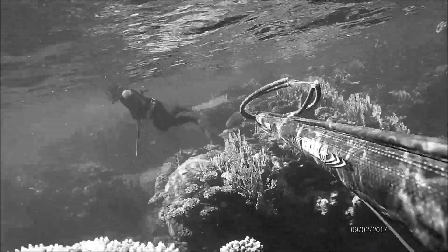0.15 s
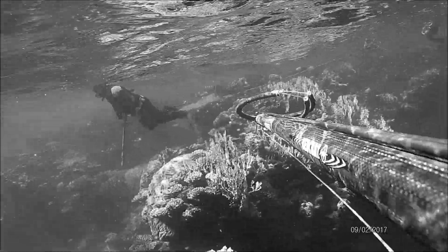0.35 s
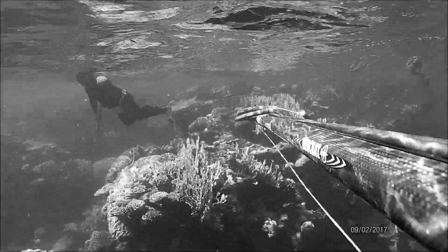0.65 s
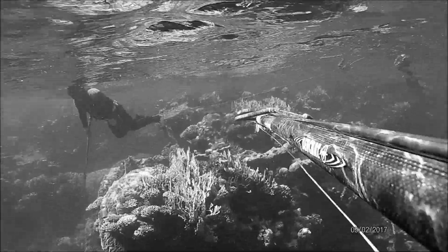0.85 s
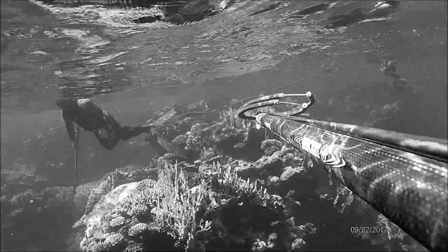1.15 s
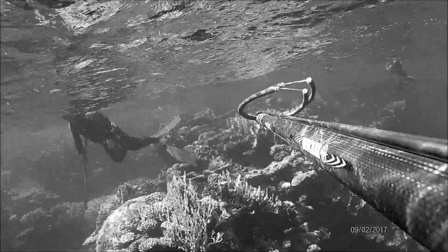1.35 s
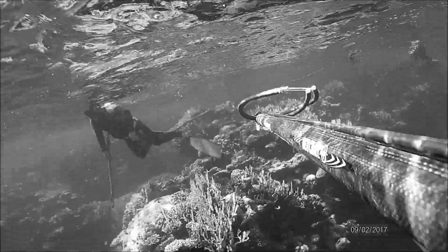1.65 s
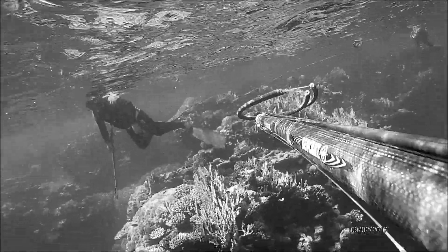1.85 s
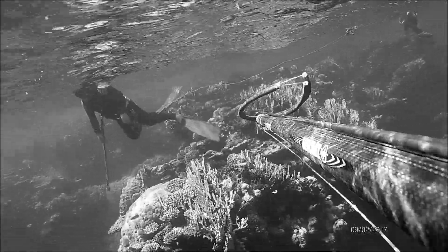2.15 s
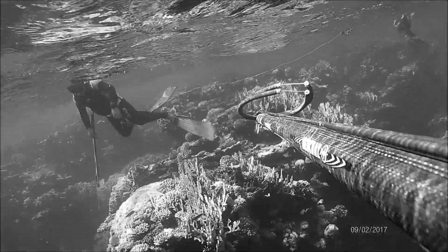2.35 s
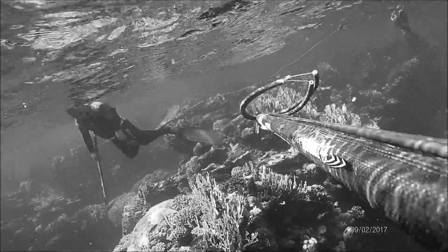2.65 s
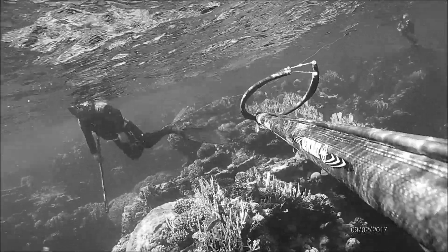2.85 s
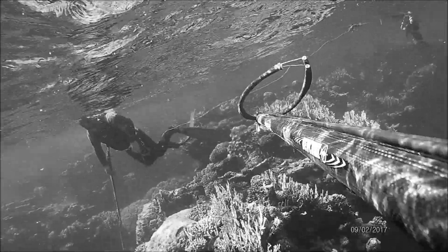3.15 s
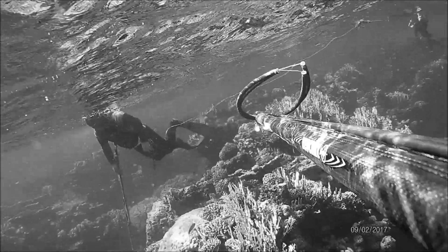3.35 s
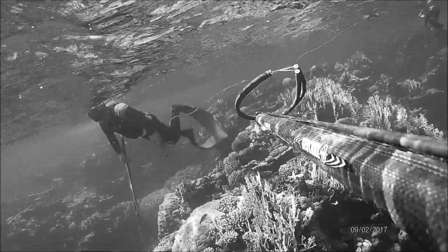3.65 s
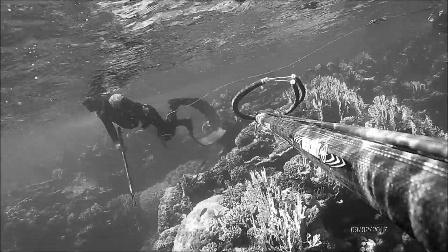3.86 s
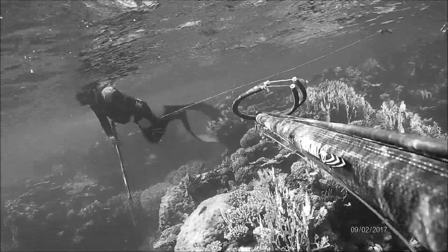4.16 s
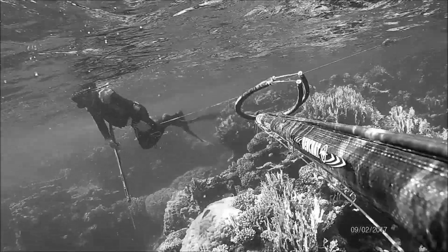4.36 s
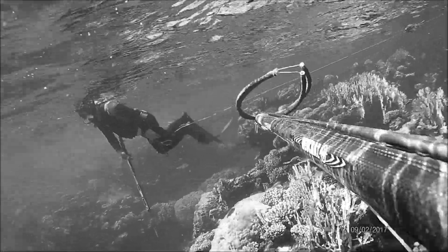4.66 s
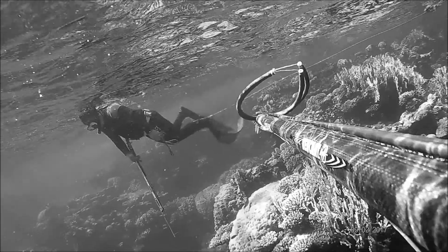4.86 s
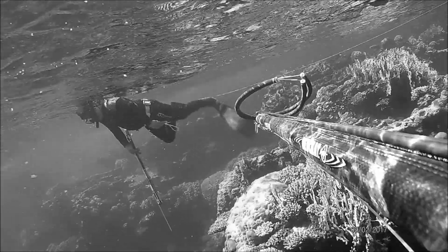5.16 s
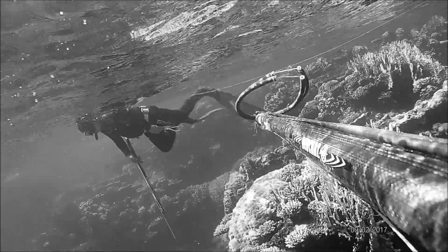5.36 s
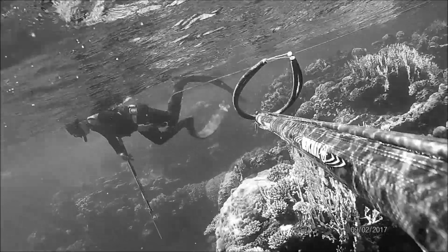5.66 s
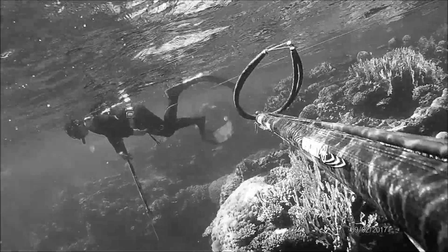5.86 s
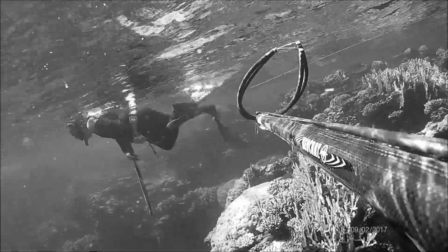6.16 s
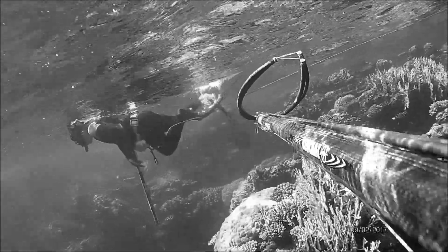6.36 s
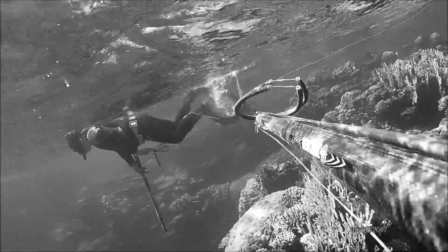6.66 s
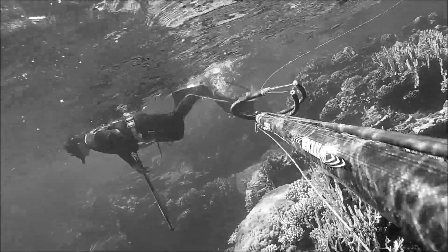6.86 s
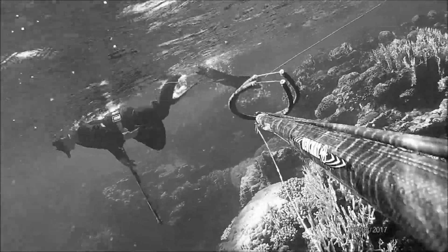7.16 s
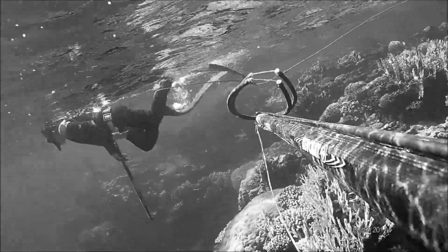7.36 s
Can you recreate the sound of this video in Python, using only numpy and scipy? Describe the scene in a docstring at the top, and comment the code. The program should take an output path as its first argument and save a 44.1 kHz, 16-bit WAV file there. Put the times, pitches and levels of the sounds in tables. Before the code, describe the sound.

Heard from inside a hard plastic camera housing under water over a reef. Low surges and dense hollow knocks build to a loud churning burst just before one second, with air tearing out in falling tones. It then settles into scattered knocks, fine crackle and snaps. From three seconds low bubbles gulp upward, with one tiny high peep and a few short plinks, over faint hiss and a thin high whine.

```python
"""A camera in a hard plastic housing drifts under water over a reef, heard through the ringing shell. From the
start water churns and surges, small bubbles fizz, the reef crackles and electronics hiss and whine: shaped
noise, short tones, struck shell modes and thin sines. Gear knocks and sharp snaps strike the shell. Just before
one second the churn peaks and air rushes out as torn, falling tones. From three seconds come low bubble gulps
that rise in pitch and one high, brief peep, and soon after short plinks of steady pitch."""
import sys
import numpy as np
from scipy import signal
from scipy.fft import rfft, irfft
from scipy.io import wavfile
from scipy.ndimage import uniform_filter1d

SR = 44100
rng = np.random.default_rng(int(sys.argv[2]) if len(sys.argv) > 2 else 0)


def invert_db(level):
    """Linear amplitude ratio for a level in decibels (20 dB per decade), elementwise."""
    return 10 ** (np.asarray(level, dtype=float) / 20)


def transcribe(signal):
    """Save signal, clipped to [-1, 1], as a 16-bit WAV file at the path in sys.argv[1]."""
    frames = np.atleast_2d(signal).T
    limited = np.clip(frames, -1, 1)
    pcm = np.round(limited * 32767).astype(np.int16)
    wavfile.write(sys.argv[1], SR, pcm)


N = 331632
T = np.arange(N) / SR


def unit(x):
    """Scale to rms 1."""
    return x / np.sqrt(np.mean(x ** 2))


def coloured(x, points):
    """Shape a signal's spectrum by points of pitch_hz and level_db."""
    pitch_hz, level_db = np.transpose(points)
    f = np.maximum(np.fft.rfftfreq(len(x), 1 / SR), 1)
    gain_db = np.interp(np.log(f), np.log(pitch_hz), level_db, left=-60, right=-60)
    return irfft(rfft(x) * invert_db(gain_db), len(x))


def walk(rate):
    """Wandering control curve: random levels held for 1 / rate s and smoothed twice; spread 1."""
    hold = int(SR / rate)
    levels = np.repeat(rng.standard_normal(N // hold + 1), hold)
    smooth = uniform_filter1d(uniform_filter1d(levels, hold), hold)
    return unit(smooth[:N])


def add(out, start_s, x):
    """Mix x into out from start_s on."""
    i = max(int(start_s * SR), 0)
    out[i:i + len(x)] += x[:N - i]


def burst(fade_ms, noise):
    """A rough contact: noise that swells at once and dies over fade_ms."""
    t = T[:len(noise)] * 1000 / fade_ms
    return noise * (1 - np.exp(-6 * t)) * np.exp(-t)


def grains(per_s, spread_db):
    """Scattered impulses, a few much stronger than the rest."""
    hit = rng.random(N) < per_s / SR
    boost_db = spread_db * np.minimum(rng.exponential(size=N), 4)
    return hit * rng.standard_normal(N) * invert_db(boost_db)


# The tones (modes) that the housing rings with: pitch_hz, width_hz (wider dies faster),
# level_db (before each kind of strike weights it)
HOUSING_MODES = [(109, 84, -16.5), (179, 33, -4.5), (403.5, 88, 3), (534.7, 38, 8.5), (565.6, 24.1, 17.5),
                 (824, 33.8, 3), (1008, 32, -7.5), (1213, 305, -12), (1493, 51, -19), (1730, 88, -21),
                 (2140, 110, -32), (2475, 190, -35), (2806, 53, -32.5), (3145, 150, -32.5),
                 (3320, 140, -40.5), (4213, 260, -39.5), (5010, 170, -57.5), (6000, 1200, -47),
                 (8100, 470, -61.5)]


def shell(weight_db, rise_ms, chance=None):
    """Ring of the housing: each mode swells, more slowly for low ones, then dies.
    weight_db(hz) says how strongly a mode is struck; chance varies its phase and strength."""
    t = T[:SR // 8]
    ring = 0
    for k, (hz, width_hz, level_db) in enumerate(HOUSING_MODES):
        start_turn, luck = (0, 0) if chance is None else chance[k]
        swell = (1 - np.exp(-t * 1000 / (rise_ms + 400 / hz))) ** 2
        fade = np.exp(-np.pi * width_hz * t)
        strength = invert_db(level_db + weight_db(hz) + 4 * luck) * width_hz
        ring = ring + strength * swell * fade * np.sin(2 * np.pi * (hz * t + start_turn))
    return ring


# Water against the shell, joined by straight lines: time_s, churn_db (before gusts), surge_db
WATER_LEVELS = [(0.0, -51, -41.5), (0.29, -88, -50), (0.48, -56.5, -56.5), (0.69, -58, -34),
                (0.88, -24, -55), (0.94, -30, -30.5), (1.11, -35.5, -51), (1.36, -55, -57),
                (1.61, -54.5, -54.5), (1.76, -43.5, -52.5), (1.99, -46, -54), (2.47, -58, -50.5),
                (2.7, -58, -67), (2.72, -58, -47), (3.35, -57, -54), (3.73, -56, -63.5), (6.41, -64, -53),
                (7.52, -60, -62.5)]
# Colours of the low water sounds, each: pitch_hz, level_db (relative)
SLOSH_COLOUR = [(80, -35.5), (110, 0.5), (200, 3.5), (300, -7), (420, 3.5), (700, -27.5), (1300, -30)]
SURGE_COLOUR = [(36, -13), (52, -2.5), (64, 6.5), (76, -1.5), (90, -1), (115, -10.5), (150, -18.5)]
SWAY_COLOUR = [(8, -5.5), (24, 14.5), (34, -13.5)]
SLOSH_FOLLOWS_CHURN, SLOSH_OFFSET_DB = 0.36, -6.5  # share of the way from surge level to churn level
SWAY_DB, SWAY_WANDER_DB, SWAY_FOLLOWS_SURGE = -49, 2, 0.58  # usual level, its spread, share of surge changes


def water():
    """Eddies drum on the shell in uneven gusts and spatter its upper modes; slosh, surge and sway pass beneath."""
    time_s, *columns = np.transpose(WATER_LEVELS)
    churn_db, surge_db = (np.interp(T, time_s, c) for c in columns)
    gust = walk(26)

    drum = shell(lambda hz: -9 * np.abs(np.log2(hz / 570)), 0.26)
    churn = unit(signal.fftconvolve(rng.standard_normal(N), drum)[:N])
    gusty_churn = churn * invert_db(6.3 * np.tanh(gust))

    upper = shell(lambda hz: 2.5 * np.log2(hz / 1000) - 25 * (hz < 700), 0.2)
    drops = unit(signal.fftconvolve(grains(500, 4), upper)[:N])
    spatter = drops * invert_db(-29.5 + 2.5 * walk(15))

    colours = (SLOSH_COLOUR, SURGE_COLOUR, SWAY_COLOUR)
    slosh, surge, sway = (unit(coloured(rng.standard_normal(N), c)) for c in colours)
    sway_db = SWAY_DB + SWAY_FOLLOWS_SURGE * (surge_db - surge_db.mean()) + SWAY_WANDER_DB * walk(3.36)
    slosh_db = SLOSH_OFFSET_DB + surge_db + SLOSH_FOLLOWS_CHURN * (churn_db - surge_db)
    slosh_db = slosh_db + 2 * gust + 2.5 * walk(14)
    low = slosh * invert_db(slosh_db) + surge * invert_db(surge_db) + sway * invert_db(sway_db)
    return (gusty_churn + spatter) * invert_db(churn_db) + low


FIZZ_PER_S, FIZZ_OFFSET_DB = 49, -4.5  # offset over the churn, before pitch and luck change it
FIZZ_LOW_HZ, FIZZ_OCTAVES = 184.2, 2.3  # lowest starting pitch and the range above it
FIZZ_CYCLES = 5.5  # starting-pitch cycles in one unit of a bubble's fading time


def fizz():
    """A cloud of small bubbles stirred up with the churn: each rings some cycles and glides up."""
    out = np.zeros(N)
    time_s, churn_db, _ = np.transpose(WATER_LEVELS)
    for when, size, luck in rng.random((int(FIZZ_PER_S * T[-1]), 3)):
        start_s = when * T[-1]
        octaves = FIZZ_OCTAVES * size
        hz = FIZZ_LOW_HZ * 2 ** octaves
        turn = T[:int(4 * FIZZ_CYCLES / hz * SR)] * hz / FIZZ_CYCLES
        # 1 dB weaker per octave; a few bubbles stand out by chance
        level_db = np.interp(start_s, time_s, churn_db) + FIZZ_OFFSET_DB - octaves - 2.9 * np.log(luck + 0.036)
        swell = (1 - np.exp(-9 * turn)) * np.exp(-2.2 * turn)
        tone = np.sin(2 * np.pi * FIZZ_CYCLES * (turn + 0.053 * turn ** 2))
        add(out, start_s, invert_db(level_db) * swell * tone)
    return out


def crackle():
    """Far snaps too many to count, coming in flurries; each swarm rings another part of the shell."""
    out, flurry = 0, walk(16)
    # centre_hz, level_db, snaps per second
    swarms = ((1276, -72.5, 260), (1796, -80, 18), (3100, -75.5, 90), (4300, -80.5, 60), (6900, -78.5, 45))
    for centre_hz, level_db, per_s in swarms:
        ring = shell(lambda hz: 8 * np.log2(hz / 1000) - 24 * np.log2(hz / centre_hz) ** 2, 0.2)
        ring = ring * np.exp(-T[:len(ring)] / 0.0027)
        swarm = grains(per_s, 4.2) * invert_db(2.8 * flurry)
        # coral scatters each snap into a short smear
        swarm = signal.fftconvolve(swarm, burst(2.5, rng.standard_normal(600)))[:N]
        out = out + invert_db(level_db) * unit(signal.fftconvolve(swarm, ring)[:N])
    return out


# Colour of the hiss: pitch_hz, level_db (relative)
HISS_COLOUR = [(880, -4.5), (1500, -9.5), (2650, -7), (3130, -12), (3630, -15.5), (9240, -16.5),
               (13700, -19), (15700, -20.5)]
HISS_DB = -74.5
WHINE_HZ, WHINE_STEP_HZ, WHINE_SAG_HZ = 13438.5, 83.2, 16  # middle, spacing, fall over the whole scene
# Level at the empty middle, and loss per doubling of 1 + 2 x the distance in steps (distance capped at 2)
WHINE_DB, WHINE_FALL_DB = -78, 11.5


def electronics():
    """Preamp hiss and a comb of thin lines that sag slowly."""
    hiss = invert_db(HISS_DB) * unit(coloured(rng.standard_normal(N), HISS_COLOUR))
    sag_hz = WHINE_SAG_HZ * (.5 - T / T[-1]) + 2.8 * walk(2.5)
    whine = np.zeros(N)
    for k in np.arange(8) - 7 / 2:
        level_db = WHINE_DB - WHINE_FALL_DB * np.log2(1 + 2 * min(abs(k), 2))
        line_hz = WHINE_HZ + k * WHINE_STEP_HZ + sag_hz
        phase = 2 * np.pi * np.cumsum(line_hz) / SR + k ** 2
        whine += invert_db(level_db) * np.sqrt(2) * np.sin(phase)
    return hiss + whine


# Gear knocking the housing: start_s, peak_db (before the wall muffles it),
# hardness_db (higher wakes more of the modes far from the main ring), rattle_ms
GEAR_KNOCKS = [(0.017, -25, -10.5, 15), (0.105, -23, -8.5, 12.4), (0.209, -37, -18, 31),
               (0.488, -38.5, -27, 22), (0.547, -23.5, -14, 9.7), (0.585, -26.5, -2, 8),
               (0.648, -14, -5, 28), (0.765, -27, 0, 17), (0.821, -16, -8.5, 18.4),
               (0.836, -10.5, -61.5, 3.2), (0.883, -21.5, -42, 4), (1.011, -29.5, 1, 32),
               (1.032, -19.5, -70, 1.9), (1.152, -32.5, -13.5, 51), (1.24, -25, -11, 89),
               (1.366, -40, -34, 14), (1.625, -33, -20.5, 34), (1.681, -35, -8, 54), (1.76, -36, 3, 53),
               (1.803, -26.5, -2, 28.5), (1.895, -32, -38, 3), (1.949, -35.5, -19, 19),
               (2.069, -28, -7, 12), (2.176, -26, -8, 22), (2.229, -33, -4, 5.7), (2.286, -28.5, 0, 34),
               (2.461, -34.5, -13, 13), (2.72, -23.5, -9, 8.1), (2.777, -33, -5.5, 32),
               (3.027, -39, -10, 8.7), (3.089, -39.5, -58, 1.8), (3.135, -25.5, -10, 14.2),
               (3.201, -34, -33, 8.6), (3.369, -34.5, -13.5, 11), (3.421, -34, 18, 4.5),
               (3.615, -35, -51, 11), (3.808, -34.5, -32, 6.9), (3.855, -39, -33, 43),
               (4.059, -48.5, 12, 6.5), (4.312, -37.5, -8.5, 3.2), (4.379, -39.5, -5, 11),
               (5.335, -43, 2, 14), (5.391, -39, -4.5, 24), (5.447, -44.5, 1, 20), (5.569, -36, -26, 15),
               (5.728, -41, -33, 8), (5.99, -42, -45, 21), (6.177, -37, -49, 9.9), (6.286, -36.5, -27, 6.8),
               (6.459, -34.5, -10.5, 7.9), (6.66, -35.5, -6, 16), (6.741, -28, -15.5, 12.4),
               (6.883, -28.5, -11, 20)]


def knocks():
    """A first blow, then a rattle; a soft contact wakes only the main ring, a hard one all modes."""
    out = np.zeros(N)
    chances = rng.random((len(GEAR_KNOCKS), len(HOUSING_MODES), 2))
    rattles = rng.standard_normal((len(GEAR_KNOCKS), 3000))
    for (start_s, peak_db, hardness_db, rattle_ms), chance, rattle in zip(GEAR_KNOCKS, chances, rattles):
        def weight_db(hz):
            far = np.clip(np.abs(np.log2(hz / 590)) / 0.18 - .2, 0, 1.1)
            return (hardness_db + 15) * far + 4.47 * np.abs(np.log2(hz / 600))

        ring = shell(weight_db, 0.66, chance)
        duller = uniform_filter1d(rattle * np.abs(rattle), size=4)
        push = duller * np.exp(-(T[:len(rattle)] * 1000 / rattle_ms) ** 1.6)
        push = .9 * push / np.sqrt(np.sum(push ** 2))
        push[0] = 1  # the first blow
        knock = signal.fftconvolve(push, ring)
        add(out, start_s - .003, knock * invert_db(peak_db) / np.abs(knock).max())
    return out


# Reef snaps: start_s, peak_db (before the wall muffles it), centre_hz (the modes near it are favoured)
REEF_SNAPS = [(0.0998, -38, 2760), (0.1309, -44, 3220), (0.188, -46.5, 3300), (0.5174, -50.5, 3110),
              (0.6445, -26.5, 3320), (0.7657, -41.5, 2820), (0.8213, -38, 2800), (0.9698, -41.5, 3030),
              (1.2076, -43.5, 3200), (1.272, -40.5, 3100), (1.33, -36, 4600), (1.3726, -39, 3370),
              (1.6058, -45, 2420), (1.8021, -37, 2800), (1.8471, -38.5, 4050), (2.065, -62, 2800),
              (2.145, -50, 4100), (2.174, -36.5, 2770), (2.2593, -34.5, 2620), (2.477, -40.5, 3000),
              (2.7761, -40, 4300), (2.9643, -39, 3100), (3.406, -42.5, 3190), (3.4612, -45.5, 3100),
              (3.6566, -43.5, 4080), (3.8778, -40.5, 3180), (4.3104, -41.5, 4700), (5.2004, -47, 3320),
              (5.661, -52, 3130), (6.2156, -51.5, 3330), (6.316, -43, 3060), (6.787, -42.5, 3100),
              (7.1218, -44.5, 4300), (7.341, -45.5, 4580), (7.4622, -50, 3300)]


def snaps():
    """A sub-millisecond shock: a bare crack, then the high modes near its centre ring briefly."""
    out = np.zeros(N)
    chances = rng.random((len(REEF_SNAPS), len(HOUSING_MODES), 2))
    cracks = rng.standard_normal((len(REEF_SNAPS), 200))
    for (start_s, peak_db, centre_hz), chance, crack in zip(REEF_SNAPS, chances, cracks):
        snap = shell(lambda hz: 9 * np.log2(hz / 1000) - 6 * np.log2(hz / centre_hz) ** 2, 0.28, chance)
        snap = snap * np.exp(-T[:SR // 8] / 0.018)
        snap /= np.abs(snap).max()
        snap[:len(crack) - 1] += .3 * np.diff(burst(.4, crack))
        add(out, start_s - .001, snap * invert_db(peak_db) / np.abs(snap).max())
    return out


def gliding_tones(tones, rough):
    """Wobbly sines with a faint octave, gliding fast at first; a higher rough tears them up more."""
    out, wobble, flutter = np.zeros(N), walk(70), walk(110)
    for start_s, length_s, start_hz, end_hz, level_db, loudest in tones:
        u = np.linspace(0, 1, int(length_s * SR))
        i = slice(int(start_s * SR), int(start_s * SR) + len(u))
        hz = start_hz + (end_hz - start_hz) * (1 - (1 - u) ** 1.6) + 30 * rough * wobble[i]
        phase = 2 * np.pi * np.cumsum(hz) / SR
        loudest = np.clip(loudest, .05, .95)
        rise, fall = np.sqrt(u / loudest), ((1 - u) / (1 - loudest)) ** 1.5
        swell = np.sin(np.pi / 2 * np.minimum(rise, fall)) ** 1.5
        swell = swell * (1 - .6 * rough + .7 * rough * flutter[i])
        out[i] += invert_db(level_db) * np.sqrt(2) * swell * (np.sin(phase) + 0.11 * np.sin(2 * phase))
    return out


# Air rushing out: start_s, length_s, start_hz, level_db (before flutter)
AIR_RUSHES = [(.839, 0.069, 401.7, -32), (.879, 0.093, 302, -28), (.93, 0.059, 250, -30)]
RUSH_HZ_PER_S, RUSH_LOUDEST = -1050, .1  # mean pitch glide; loudest point as a share of the length


def rushes():
    """Air rushing out falls in pitch and tears up."""
    tones = [(s, length_s, hz, hz + RUSH_HZ_PER_S * length_s, level_db, RUSH_LOUDEST)
             for s, length_s, hz, level_db in AIR_RUSHES]
    return gliding_tones(tones, rough=1.5)


# Low bubble gulps rising in pitch, and one high, brief peep: # start_s, length_s, start_hz, level_db (before
# flutter), loudest (0-1 of the length)
RISING_TONES = [(2.984, .05, 289, -45, 0.54), (3.171, 0.064, 263, -44.5, 0.98),
                (3.297, 0.077, 262, -40.5, 0.75), (3.448, 0.095, 200, -43, 0.77),
                (3.618, 0.074, 262, -41, 0.84), (3.721, 0.062, 282, -40, 0.68),
                (3.895, 0.099, 247.5, -46.5, 0.56), (4.096, 0.068, 254, -48.5, 0.9),
                (4.402, 0.07, 258, -52, 0.52), (5.065, 0.046, 3320, -56.5, 0.5),
                (5.193, 0.079, 300, -34.5, 0), (5.444, 0.14, 173, -43.5, 0.67),
                (5.715, 0.16, 247, -38.5, 0), (5.899, 0.11, 222, -56, 0.9),
                (6.102, 0.089, 224.4, -39, 0.79), (6.274, 0.12, 273, -40, .05),
                (6.396, 0.07, 188, -45, 0.34), (6.462, 0.061, 382, -42.5, .1),
                (7.257, 0.08, 477, -49, 0.32)]
RISE_TOP_HZ, RISE_LEAST_HZ = 343, 27  # every tone climbs to this pitch, or by at least this much


def rising_tones():
    """Low bubble gulps, each a pocket of air ringing upward, and one high, brief peep; all wobble mildly."""
    tones = [(s, length_s, hz, max(RISE_TOP_HZ, hz + RISE_LEAST_HZ), level_db, loudest)
             for s, length_s, hz, level_db, loudest in RISING_TONES]
    return gliding_tones(tones, rough=.45)


# Short plinks, some of them the shell ringing near 1200 Hz under a snap or knock:
# start_s, peak_db (before the wall muffles it), pitch_hz
SHORT_PLINKS = [(3.653, -38.5, 1226), (4.0564, -37.5, 1190), (4.9945, -34.5, 1680), (6.318, -40.5, 1237),
                (6.787, -41.5, 1214), (6.954, -58, 1760), (6.986, -54, 1740), (7.036, -56, 1730),
                (7.0665, -50.5, 1730), (7.15, -50.5, 1756)]


def plinks():
    """Brief steady tones that swell at once and die within milliseconds."""
    out, t = np.zeros(N), T[:SR // 20]
    swell = (1 - np.exp(-t / 0.00014)) ** 2 * np.exp(-t / 0.0043)
    for start_s, peak_db, pitch_hz in SHORT_PLINKS:
        tone = np.sin(2 * np.pi * pitch_hz * t)
        add(out, start_s - .002, invert_db(peak_db) * swell / swell.max() * tone)
    return out


def scene():
    """The housing wall muffles the treble of everything but the electronics."""
    wet = water() + fizz() + crackle() + knocks() + snaps() + rushes() + rising_tones() + plinks()
    wall = signal.butter(2, 7300, fs=SR, output="sos")  # Hz
    return (signal.sosfilt(wall, wet) + electronics())[None]


def low_pass(x):
    """Removes everything above the highest recorded frequency."""
    return signal.sosfilt(signal.butter(12, 16410, fs=SR, output="sos"), x)


def record(dry):
    """The camera cuts the top of the treble steeply."""
    top_cut = signal.ellip(10, .2, 60, 15790, fs=SR, output="sos")  # Hz
    mix = signal.sosfilt(top_cut, dry)
    return low_pass(mix)


dry = scene()
out = record(dry)
transcribe(out)
```